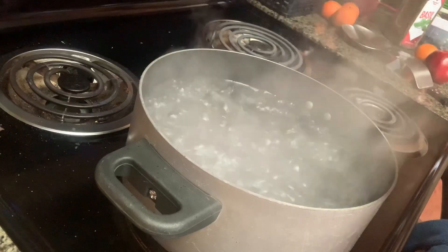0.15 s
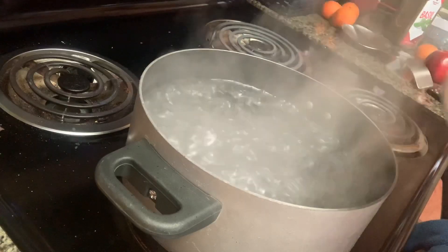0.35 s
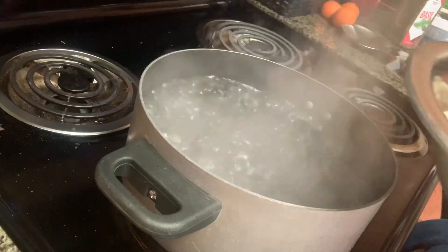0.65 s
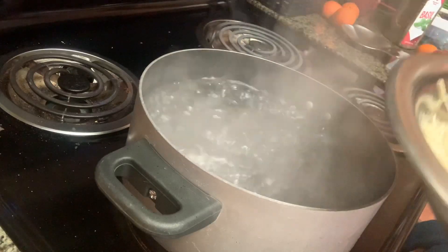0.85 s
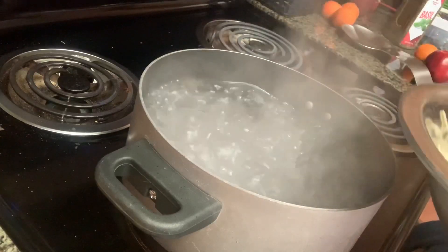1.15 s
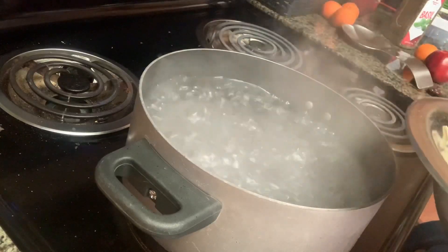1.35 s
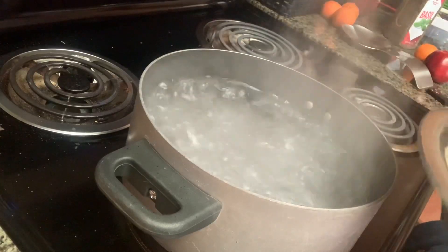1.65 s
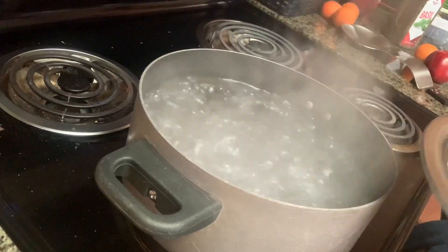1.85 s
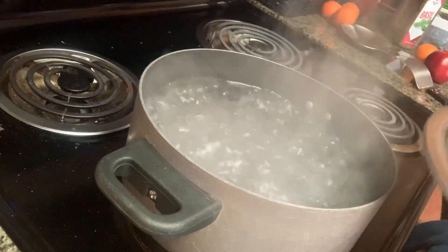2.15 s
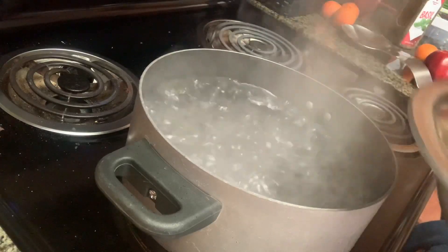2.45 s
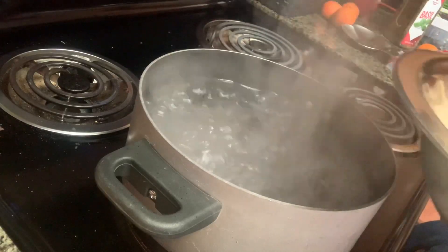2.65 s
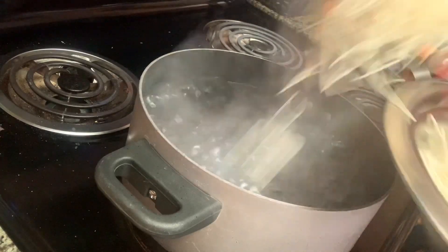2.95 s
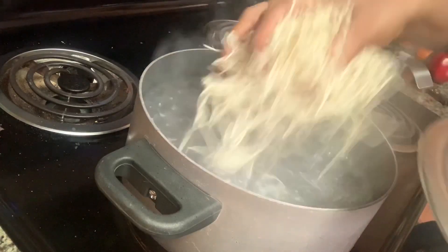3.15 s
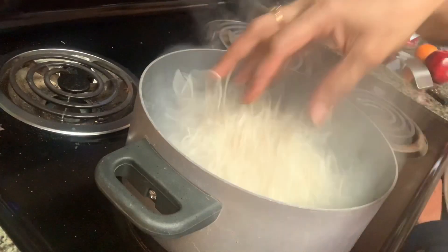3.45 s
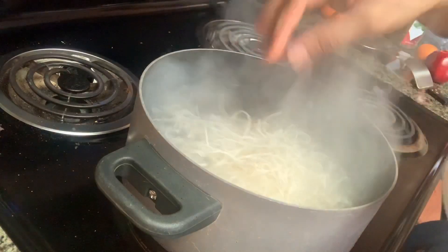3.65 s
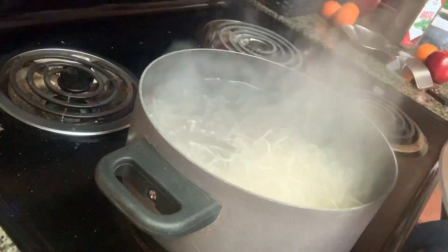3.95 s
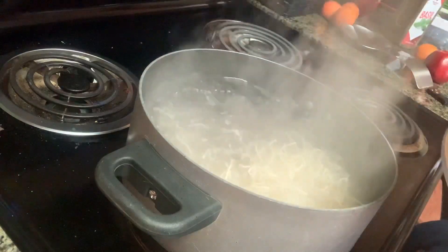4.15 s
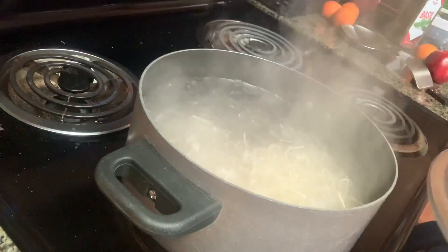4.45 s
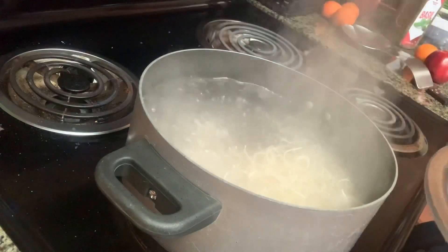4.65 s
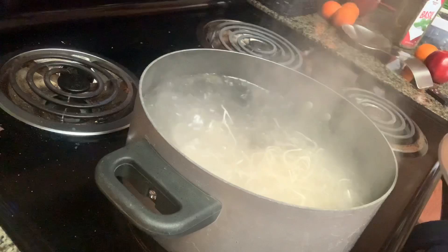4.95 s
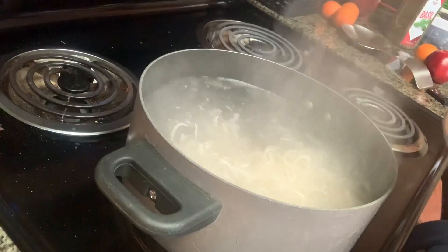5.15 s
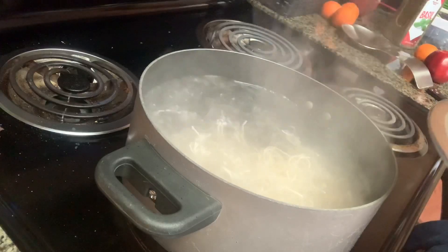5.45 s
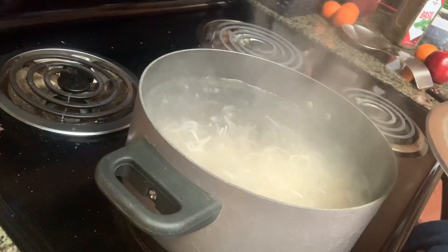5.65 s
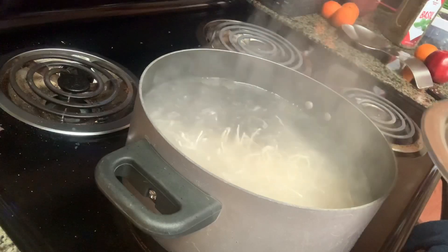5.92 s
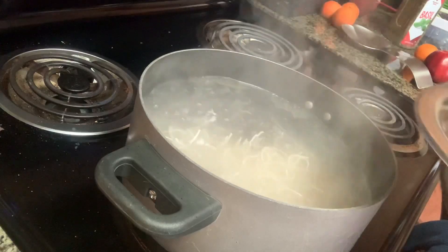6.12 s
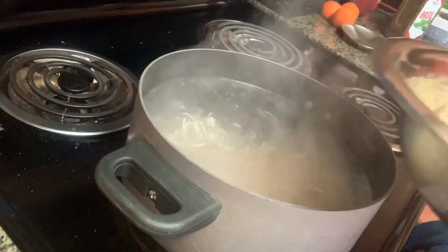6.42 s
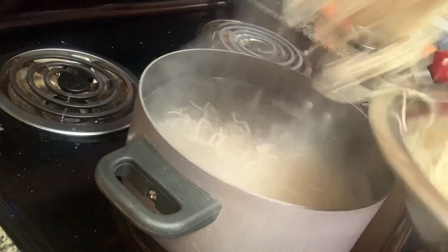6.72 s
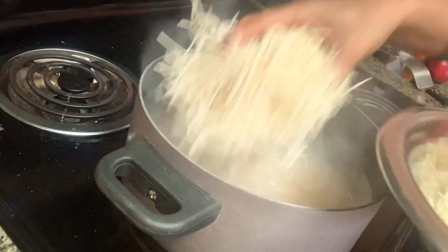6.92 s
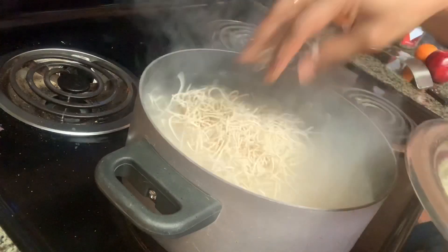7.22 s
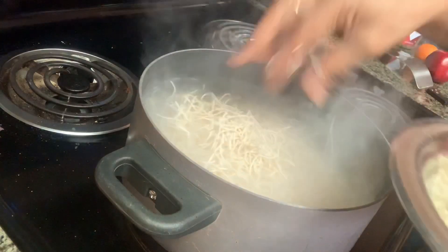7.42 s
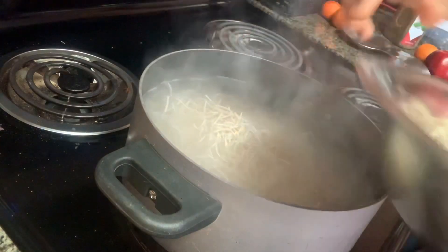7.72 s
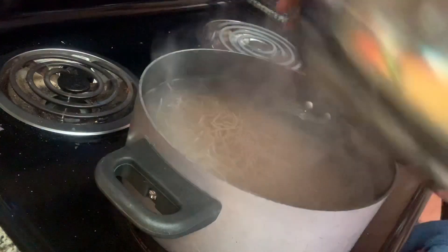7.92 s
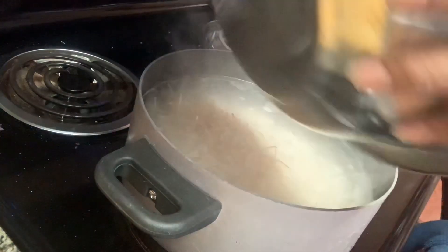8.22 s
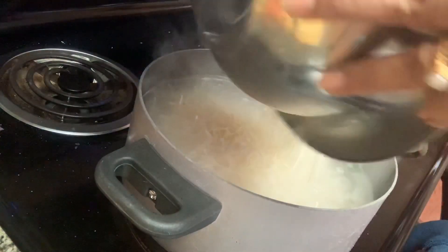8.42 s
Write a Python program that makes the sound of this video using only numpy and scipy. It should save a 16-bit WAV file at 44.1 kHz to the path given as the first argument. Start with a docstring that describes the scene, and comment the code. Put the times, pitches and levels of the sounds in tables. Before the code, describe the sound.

Steady bubbling and washing water in a hollow metal pot, heard close up in stereo, with sharp crackles, thin steam whistles and frying hiss from the burner. A dull knock comes first, then a brief noodle rustle, foamy gurgling with busy spitting, one metallic tick and another soft rustle. Finally noodles slide out with a rising dry swish and fitful metallic ringing over a faint hum.

```python
"""A pot of water boils in a small kitchen: ringing bubbles over washing noise, plops and two surges of foam. On
the electric coil below, water sizzles, spits and whistles as noise bursts coloured by a ringing drip pan; the
hot metal ticks once. A bowl bumps against the pot, setting its modes ringing, with a noisy boom. Two handfuls
of dry noodles rustle as granular noise, the pot foaming up between them, and more slide out of the tipped bowl,
whose wall rings. Behind it all, steady mains hum and a wavering motor hum are sines, over a rumble of filtered
noise."""
import sys
import numpy as np
from scipy import signal
from scipy.fft import rfft, irfft
from scipy.io import wavfile
from scipy.ndimage import map_coordinates

SR = 44100
rng = np.random.default_rng(int(sys.argv[2]) if len(sys.argv) > 2 else 0)


def file_out(sig):
    """Save sig as 16-bit WAV at sys.argv[1]."""
    # one column per channel
    cols = np.atleast_2d(sig).T
    # limit, then scale
    lim = np.clip(cols, -1, 1)
    pcm = np.round(lim * 32767).astype(np.int16)
    wavfile.write(sys.argv[1], SR, pcm)


N = 378378
TIME = np.arange(N) / SR
BINS_HZ = np.arange(N // 2 + 1) * SR / N

# resonances of the drip pan under the coil: (frequency [Hz], width [Hz], level [dB])
PAN = [(3857, 570, 7.5), (4074, 150, 2.5), (5110, 20, -0.5), (6260, 910, -5), (5900, 1060, 3)]
# spectrum of the hiss on the coil: (frequency [Hz], density [dB per Hz])
HISS = [(2500, -66), (4500, -12), (5800, -8.5), (6600, 5.5), (7600, -2.5), (10000, 5), (12500, -2),
        (15500, -1)]
# resonances of the pot: (frequency [Hz], width [Hz], level [dB])
POT_AIR = [(297.5, 22, 8.5), (757.7, 8.7, 14), (909, 10.5, 10), (1270, 10, 2.5), (2030, 29, 10.5),
           (2275, 8.3, -4.5), (2440, 60, -4)]
# water spilt on the coil flares up quickly and boils dry
SPILL_RISE_DB_PER_S, SPILL_DRY_DB_PER_S = 500, 250


def from_db(db):
    """Decibels to gain."""
    return np.exp(np.asarray(db) * (np.log(10) / 20))


def rms_one(x):
    """Scale to unit power."""
    return x / np.sqrt(np.mean(x ** 2) + 1e-20)


def level(rows, axis=1):
    """Gain over time from one dB column of a curve; silent more than 0.1 s outside it."""
    rows = np.array(rows)
    inside = (TIME >= rows[0, 0] - .1) * (TIME <= rows[-1, 0] + .1)
    return from_db(np.interp(TIME, rows[:, 0], rows[:, axis])) * inside


def drift(rate):
    """Random wander: straight lines between normal draws of spread 1, `rate` draws per second."""
    knots = rng.standard_normal(N // 100)
    return np.interp(TIME * rate, np.arange(len(knots)), knots)


def fade(t, t60):
    """Exponential decay that starts at t = 0 and loses 60 dB in t60 seconds."""
    return from_db(-60 * np.maximum(t, 0) / t60) * (t >= 0)


def swell(s, length, rise_db_per_s, fall_db_per_s):
    """Gain that rises to 1 at time s, holds for its length and dies away."""
    rise = rise_db_per_s * np.maximum(s - TIME, 0)
    fall = fall_db_per_s * np.maximum(TIME - s - length, 0)
    return from_db(-rise - fall)


def add(track, s, sound):
    """Mix a short sound into a track at time s."""
    at = max(round(s * SR), 0)
    track[at:at + len(sound)] += sound[:N - at]


def colour(x, spectrum):
    """Give a white signal a smooth spectrum, rolled off below its first row, keeping its power."""
    hz, db = np.transpose(spectrum)
    low_cut = np.minimum(BINS_HZ / hz[0], 1) ** 2
    gain = from_db(np.interp(np.log(BINS_HZ + 1), np.log(hz), db)) * low_cut
    return irfft(rfft(x) * rms_one(gain), N)


def resonate(x, modes):
    """Parallel two-pole resonances of (Hz, width, dB), about keeping the power of a white signal."""
    out, power = 0, 0
    for k, (hz, width, db) in enumerate(modes):
        r = np.exp(-np.pi * width / SR)
        gain = from_db(db) * (-1) ** k * (1 - r * r) / 2  # alternating signs
        poles = [1, -2 * r * np.cos(2 * np.pi * hz / SR), r * r]
        out = out + signal.lfilter([gain, 0, -gain], poles, x + 1e-18)
        power += from_db(db) ** 2 * np.pi * width / SR
    return out / np.sqrt(power)


def diffuse():
    """White stereo noise whose two sides are more or less alike at each pitch."""
    # likeness of the two sides: (frequency [Hz], likeness [0-1])
    likeness = [(90, .95), (300, .25), (2700, .55), (6500, .3), (7900, .97), (14500, .82)]
    alike = np.interp(BINS_HZ, *np.transpose(likeness))
    mid, side = rfft(rng.standard_normal((2, N)))
    sides = np.sqrt(1 + alike) * mid + np.sqrt(1 - alike) * side * [[1], [-1]]
    return rms_one(irfft(sides, N))


def grains(per_s, spread_db):
    """Random clicks of uneven size, unit power."""
    sizes = from_db(spread_db * np.minimum(rng.exponential(1, N), 4))
    return rms_one(sizes * rng.choice([-1, 1], N) * (rng.random(N) < per_s / SR))


def crackle(per_s, spread_db, burst_t60, smooth_db):
    """Tiny bursts, each a puff of noise, over an even hiss; stereo, unit power."""
    decay = from_db(-120 / (burst_t60 * SR))  # of the power, hence twice the dB
    bursts = signal.lfilter([1], [1, -decay], grains(per_s, spread_db) ** 2 + 1e-18)
    return rms_one(np.sqrt(bursts / bursts.mean() + from_db(smooth_db) ** 2) * diffuse())


def bubbles(low_hz, high_hz, per_s, cycles, spread_db=3.3, count=10):
    """Small bubbles, each ringing at one of `count` pitches after a click; unit power."""
    clicks = grains(per_s, spread_db)
    dealt = rng.integers(0, count, N)  # which pitch each click gets
    pitches = enumerate(np.geomspace(low_hz, high_hz, count))
    return rms_one(sum(resonate(clicks * (dealt == k), [(hz, 2 * hz / cycles, 0)]) for k, hz in pitches))


def mottle(x, depth_db, patch_hz, per_s=20):
    """Narrow bands swell and fade on their own, so the colour keeps shifting; unit power."""
    hz, s, cells = signal.stft(x, SR, nperseg=512)
    grid = np.meshgrid(hz / patch_hz, s * per_s, indexing="ij")
    field = map_coordinates(rng.standard_normal(cells.shape[1:]), grid, order=1, mode="wrap")
    return rms_one(signal.istft(cells * from_db(depth_db * field), SR)[1][..., :N])


def strike(blows, modes):
    """Every blow (s, dB) sets the same decaying modes (Hz, dB, t60) ringing."""
    t, out = np.arange(SR // 3) / SR, np.zeros(N)
    ring = sum(from_db(db) * fade(t, t60) * np.sin(2 * np.pi * hz * t) for hz, db, t60 in modes)
    for s, db in blows:
        add(out, s, from_db(db) * ring)
    return out


def widen(x, lags):
    """Widen the stereo: at each pitch the left side lags the right by a set phase, half on either side."""
    lag = np.interp(BINS_HZ, *np.transpose(lags))
    return irfft(rfft(x) * np.exp(.5j * lag * [[-1], [1]]), N)


def appliances(waver_db=1.5):
    """A wavering motor hum of rotation orders and a steady mains hum, over the rumble of moving air."""
    motor_hz, mains_hz, mains_db = 59.3, 120, -56.5
    # the motor's orders: (multiple of its frequency, level [dB])
    motor_orders = [(1, -52.5), (3, -60.5), (5, -75)]
    # spectrum of the moving air: (frequency [Hz], density [dB per Hz])
    air_spectrum = [(30, -30), (42, 8), (72, -3), (140, -3), (500, -17), (4000, -69)]
    motor = sum(from_db(db + waver_db * drift(2.38)) * np.cos(2 * np.pi * order * motor_hz * TIME)
                for order, db in motor_orders)
    mains = from_db(mains_db) * np.sin(2 * np.pi * mains_hz * TIME)
    rumble = from_db(-53.0) * colour(diffuse(), air_spectrum)
    return (np.sqrt(2) * (motor + mains) + rumble) * from_db([[1.2], [-1.2]])  # a little to the left


def bump(low_cut_hz=270, room_db=-31, room_t60=0.3):
    """The bowl knocks against the pot, whose body rings with a dull knock, mostly on the right, followed by the
    boom of the kitchen."""
    # the bowl grazes, bumps and rebounds: (time [s], left level [dB], right level [dB])
    knocks = [(1.2465, -46, -24), (1.2553, -27, -11), (1.2651, -23, -33)]
    # what the bump rings with: (frequency [Hz], level [dB], t60 [s])
    knock_modes = [(300, -9, 0.1), (400, -12, 0.098), (502, -7, 0.062), (613, -12, 0.1), (770, -19.5, 0.12),
                   (1240, -18, 0.0075)]
    left_knock = strike([(s, left) for s, left, right in knocks], knock_modes)
    right_knock = strike([(s, right) for s, left, right in knocks], knock_modes)
    room = resonate(diffuse(), [(320, 35, 0), (550, 107, -0.83)])
    boom = from_db(room_db) * fade(TIME - knocks[1][0], room_t60) * room
    low_cut = signal.butter(4, low_cut_hz, "high", fs=SR, output="sos")
    return signal.sosfilt(low_cut, np.array([left_knock, right_knock]) + boom)


def noodles(catch_db=2):
    """Brittle strands rub on each other, then swish over the bowl, whose wall rings fitfully as they catch."""
    # handfuls of dry noodles rubbing as they drop in: (time [s], length [s], level [dB])
    drops = [(3.354, 0.015, -39.5), (7.017, 0.076, -42)]
    # spectrum of the falling handfuls: (frequency [Hz], density [dB per Hz])
    rustle = [(300, -27), (900, -2), (3400, 7), (7000, -6.5), (10000, 1), (15000, -8)]
    # the bowl is tipped and the noodles slide out: (time [s], level [dB])
    slide = [(7.8, -59), (7.97, -43), (8.04, -40), (8.19, -31.5), (8.41, -32.5), (8.58, -35.5)]
    # spectrum of the sliding noodles: (frequency [Hz], density [dB per Hz])
    swish = [(500, -26.5), (4600, -18.5), (10500, -13.5), (15500, -17.5)]
    # resonances of the bowl's wall: (frequency [Hz], width [Hz], level [dB])
    bowl = [(1422, 17, -8), (1830, 90, -14), (2510, 43, -18), (2860, 45, -11), (3320, 160, -9),
            (3720, 400, -2.5)]
    bowl_db, bowl_s, bowl_length_s, lag_s_per_octave = -41.5, 8.04, 0.26, 0.28

    rubbing = crackle(per_s=2200, spread_db=1.7, burst_t60=0.004, smooth_db=-1)
    rubbing = mottle(rubbing, depth_db=4.5, patch_hz=150)
    handfuls = sum(from_db(db) * swell(s, length, rise_db_per_s=80, fall_db_per_s=199)
                   for s, length, db in drops)
    wall = 0
    for hz, width, db in bowl:
        # as the bowl empties, ever lower modes are freed
        freed_s = bowl_s + lag_s_per_octave * np.log2(bowl[-1][0] / hz)
        ringing = swell(freed_s, bowl_length_s, rise_db_per_s=130, fall_db_per_s=27)
        catching = from_db(bowl_db + db + catch_db * drift(28))
        wall = wall + catching * ringing * resonate(rubbing, [(hz, width, 0)])
    left_of_centre = (handfuls * colour(rubbing, rustle) + wall) * from_db([[.9], [-.9]])
    return left_of_centre + level(slide) * colour(rubbing, swish)


def metal_tick():
    """The hot metal ticks once: a sharp blow sets its decaying modes ringing."""
    # the one tick: (time [s], level [dB])
    ticks = [(5.8705, -27)]
    # what the metal rings with: (frequency [Hz], level [dB], t60 [s])
    tick_modes = [(1030, -7, 0.03), (5080, -1.5, 0.13), (5150, 3, 0.058)]
    return strike(ticks, tick_modes)


def whistles(waver_db=5.0):
    """Steam squeezed out under a skating drop sings hoarsely: wavering noise through one resonance."""
    # the whistles: (time [s], length [s], level [dB], frequency [Hz], width [Hz])
    squeals = [(0.122, 0.024, -44.5, 4110, 200), (2.815, 0.11, -54, 4100, 200),
               (4.316, 0.0099, -36.5, 4020, 230), (6.527, 0.19, -50, 4150, 230),
               (6.635, 0.052, -42.5, 5300, 1100)]
    steam = diffuse() * from_db(waver_db * drift(130))
    out = 0
    for s, length, db, hz, width in squeals:
        gain = from_db(db) * swell(s, length, SPILL_RISE_DB_PER_S, SPILL_DRY_DB_PER_S)
        out = out + gain * resonate(steam, [(hz, width, 0)])
    return out


def spits(fry_db=-18):
    """A drop flashes to steam with a crack, then fries away, hissing and ringing the drip pan."""
    # drops hitting the coil: (time [s], level [dB], coarse sputter relative to it [dB])
    drops = [(.108, -25.5, 1.5), (.1915, -39, -20), (0.212, -34.5, -14), (.281, -22, -19), (.296, -32, -16),
             (.36, -28, -29), (.504, -31, -30), (0.969, -31.5, -14), (0.995, -34.5, -24), (1.24, -31, -5),
             (1.252, -35, 6), (1.294, -30.5, -22), (1.367, -37, -18), (1.412, -31, -11), (1.4774, -40, -10),
             (1.609, -40.5, -22), (1.784, -35.5, -11), (1.829, -36, -2), (2.333, -37.5, -23),
             (2.364, -36.5, -21), (2.555, -28.5, -4.5), (2.641, -31, -7), (2.659, -36.5, -3),
             (2.776, -35.5, 2.5), (2.823, -39, 6), (4.21, -25, -20), (4.278, -36, 6), (4.326, -31.5, 10),
             (4.359, -30, -17), (4.3741, -24, -23), (4.598, -32.5, -17), (4.671, -29, 0), (4.8304, -37, -2),
             (5.0075, -35, -16), (5.443, -29.5, 4), (5.571, -31.5, -6), (5.6345, -31.5, 4.5),
             (5.694, -40, -3), (5.828, -38, 13.5), (5.87, -22.5, 7.5), (5.909, -25, -7), (6.437, -33, -5),
             (6.4943, -22.5, -35), (6.542, -31, -15), (6.688, -33, 5)]
    t = np.arange(SR // 4) / SR
    crack_and_fry = fade(t, .026) + from_db(fry_db) * fade(t, .18)
    shape = (1 - np.exp(-t / .0005)) * crack_and_fry
    fine, coarse = np.zeros((2, N))
    for s, db, coarse_db in drops:
        add(fine, s, from_db(db) * shape)
        add(coarse, s, from_db(db + coarse_db) * shape)
    noise = diffuse()
    return from_db(6.5) * colour(fine * noise, HISS) + from_db(-3.5) * resonate(coarse * noise, PAN)


def sizzle(patchy_db=2, flutter_db=2.5):
    """Water fries on the coil: fine bursts hiss, tiny bubbles fizz, coarse bursts ring in the drip pan."""
    # the film of water that keeps frying, renewed when the pot foams up: (time [s], level [dB])
    film = [(0, -46), (.85, -42.5), (1.7, -43), (2.1, -49), (3.0, -50.5), (3.955, -62), (3.995, -42.5),
            (5.9, -37.5), (6.12, -52.5), (6.85, -51.5), (7.35, -63.5), (7.7, -60)]
    film_sputter_db = -3.5  # its coarse sputter relative to its hiss
    # water slopping onto the coil: (time [s], length [s], level [dB], coarse sputter relative to it [dB])
    spills = [(0.127, 0.21, -42, -5), (1.183, 0.11, -37, -5), (1.423, 0.046, -34, -7),
              (4.09, 0.18, -39.5, 0.5), (4.527, 0.019, -36, 3.5), (4.657, 0.28, -36.5, -6),
              (4.83, 0.044, -35.5, 3), (5.26, 0.047, -40.5, -4), (6.546, 0.12, -35.5, -9)]
    # the deep sputter while foam spills over: (time [s], level [dB])
    froth_curve = [(4.04, -79), (4.11, -65), (4.85, -45), (5.1, -52), (5.9, -52), (6.1, -64)]
    froth_hz, froth_width_hz = 3270, 310

    hiss_power = level(film) ** 2
    sputter_power = hiss_power * from_db(film_sputter_db) ** 2
    for s, length, db, sputter_db in spills:
        spill = from_db(db) * swell(s, length, SPILL_RISE_DB_PER_S, SPILL_DRY_DB_PER_S)
        hiss_power = hiss_power + spill ** 2
        sputter_power = sputter_power + (from_db(sputter_db) * spill) ** 2

    fine = crackle(per_s=280, spread_db=3.3, burst_t60=.012, smooth_db=-1)
    fine = from_db(-3.7) * mottle(fine, depth_db=4, patch_hz=220)
    pops = from_db(-7.5) * crackle(per_s=90, spread_db=2.5, burst_t60=.004, smooth_db=-30)
    fizz = bubbles(low_hz=5000, high_hz=15000, per_s=1200, cycles=220, spread_db=3, count=18)
    hiss = np.sqrt(hiss_power) * (colour(fine + pops, HISS) + from_db(-7.5) * fizz)

    bursts = crackle(per_s=130, spread_db=2.0, burst_t60=0.14, smooth_db=-9.5)
    coarse = 0
    for hz, width, db in PAN:
        # as the drops skate about, now one and now another resonance of the pan stands out
        patchy = from_db(db + patchy_db * drift(16)) * np.sqrt(width)
        coarse = coarse + patchy * resonate(bursts, [(hz, width, 0)])
    chirps = bubbles(low_hz=3100, high_hz=7200, per_s=450, cycles=130, spread_db=3.5, count=18)
    sputter = np.sqrt(sputter_power) * (from_db(-6.0) * rms_one(coarse) + from_db(-11) * chirps)
    froth = level(froth_curve) * resonate(bursts, [(froth_hz, froth_width_hz, 0)])
    return from_db(flutter_db * drift(30)) * (hiss + froth + sputter)


def plops(ring_t60=0.027, swell_s=0.0008, push_t60=0.038, splash_swell_s=0.0051, splash_t60=0.16):
    """The cavity of a bursting bubble pings, its push sets the pot ringing, and a little water splashes."""
    # big bubbles bursting: (time [s], level [dB], pitch [Hz])
    bursts = [(0.5894, -46, 1980), (1.483, -42.5, 2080), (2.227, -43, 2080), (2.696, -44, 1880),
              (3.414, -43, 2030), (3.47, -57.5, 1690), (3.716, -41, 2220), (4.656, -44.5, 2030),
              (5.259, -41.5, 1900), (5.65, -39.5, 2100), (6.325, -43.5, 2000), (6.922, -41.5, 2490),
              (7.7544, -46, 1950)]
    # spectrum of the splash: (frequency [Hz], density [dB per Hz])
    splash_spectrum = [(520, -4), (750, 3.5), (2700, -1.5), (5000, -7), (14000, -13.5)]
    t = np.arange(SR // 4) / SR
    rings, pushes, splashes = np.zeros((3, N))
    for s, db, hz in bursts:
        ping = (1 - np.exp(-t / swell_s)) * fade(t, ring_t60) * np.sin(2 * np.pi * hz * t)
        add(rings, s, from_db(db) * ping)
        add(pushes, s, from_db(db) * fade(t, push_t60))
        add(splashes, s, from_db(db) * (1 - np.exp(-t / splash_swell_s)) * fade(t, splash_t60))
    noise = diffuse()
    pings = rings * from_db([[10.5], [5]])  # louder on the left
    pot_ring = from_db(9.0) * resonate(pushes * noise, POT_AIR[1:])
    return pings + pot_ring + from_db(7.5) * splashes * colour(noise, splash_spectrum)


def boil():
    """Bubbles ring over churning water, a deeper gurgle foams up, and the air in the pot rings along."""
    # the rolling boil: (time [s], level [dB])
    boil_curve = [(0, -49.5), (1.3, -45.5), (1.8, -49), (3.9, -49.5), (5.8, -49.5), (6.6, -52.5),
                  (8.58, -50)]
    # surges of foam between the two handfuls of noodles: (time [s], length [s], level [dB])
    surges = [(4.128, 0.27, -51.5), (4.674, 0.2, -47)]
    # spectrum of the churning water: (frequency [Hz], density [dB per Hz])
    water = [(170, 4), (330, 3.5), (560, -4.5), (800, 7), (1300, -2.5), (2000, -3), (8000, -22.5)]
    # spectrum of the foam's gurgle: (frequency [Hz], density [dB per Hz])
    gurgle_spectrum = [(150, -12), (320, -5.5), (500, -6.5), (2000, -11), (4000, -7), (9000, -46)]
    simmer = from_db(-9) * bubbles(low_hz=330, high_hz=1900, per_s=350, cycles=22, spread_db=2)
    churn = crackle(per_s=150, spread_db=4.0, burst_t60=0.042, smooth_db=1.0)
    wash = from_db(-4.5) * colour(churn, water)
    glugs = crackle(per_s=280, spread_db=-9.0, burst_t60=0.088, smooth_db=-18.0)
    gurgle = from_db(4.0) * colour(glugs, gurgle_spectrum)
    hollow = resonate(diffuse(), POT_AIR[:3])
    foam = sum(from_db(db) * swell(s, length, rise_db_per_s=145, fall_db_per_s=89)
               for s, length, db in surges)
    rolling = level(boil_curve) * (simmer + wash + from_db(-17.5) * hollow)
    return rolling + foam * (gurgle + from_db(-1.5) * hollow)


def scene():
    """The coil is straight ahead, the inside of the pot a little to the left."""
    # phase by which the left side lags the right, for the coil: (frequency [Hz], lag [rad])
    coil_lag = [(250, 0), (1900, 1.1), (2400, 2.9), (3100, 3.5), (4400, 6.1), (5300, 7.9), (7700, 9.35),
                (9200, 9.5), (11800, 12.55), (13600, 12.6), (15300, 15.65)]
    # the same for the pot: (frequency [Hz], lag [rad])
    pot_lag = [(100, 0), (1000, -1), (5500, -3), (9000, -3), (11800, 0)]
    coil = sizzle() + whistles() + spits() + metal_tick()
    pot = (boil() + plops()) * from_db([[1.1], [-1.1]]) + noodles()
    return widen(coil, coil_lag) + widen(pot, pot_lag) + bump() + appliances()


def record(dry):
    """A steep elliptic low-pass cuts the top."""
    cutoff_hz = 15600
    return signal.sosfilt(signal.ellip(10, .2, 70, cutoff_hz, fs=SR, output="sos"), dry)


dry = scene()
out = record(dry)
file_out(out)
```